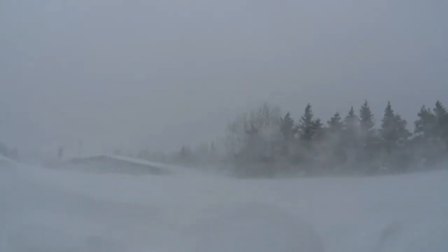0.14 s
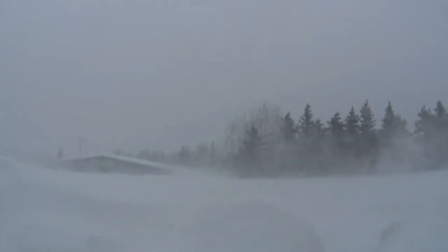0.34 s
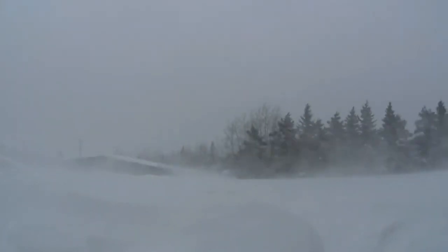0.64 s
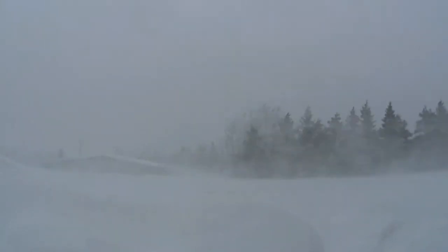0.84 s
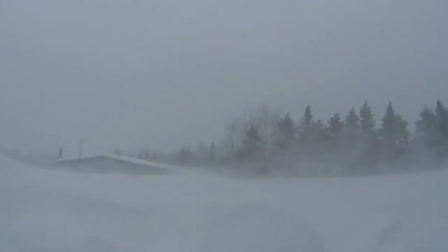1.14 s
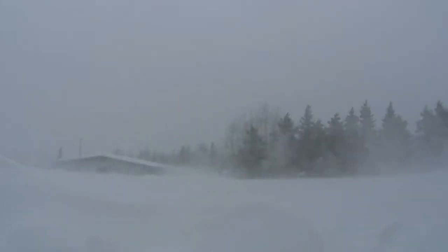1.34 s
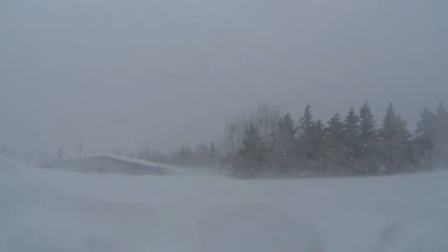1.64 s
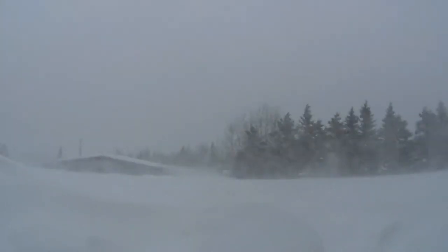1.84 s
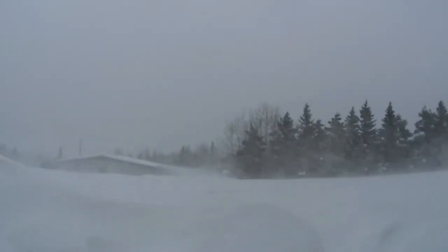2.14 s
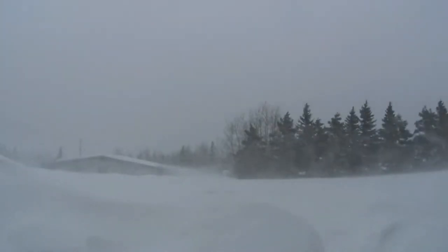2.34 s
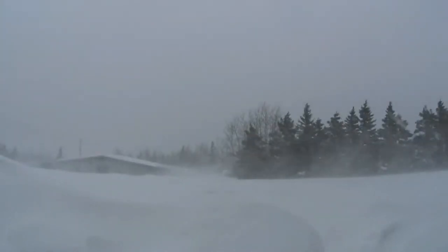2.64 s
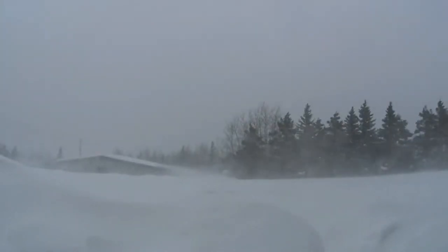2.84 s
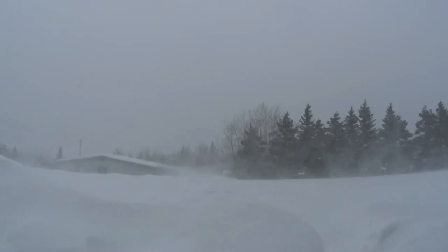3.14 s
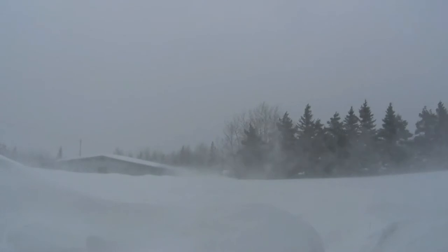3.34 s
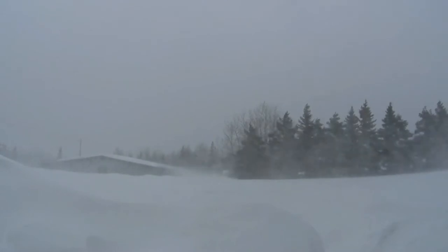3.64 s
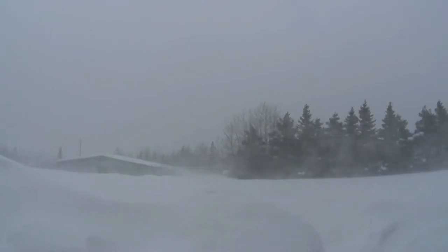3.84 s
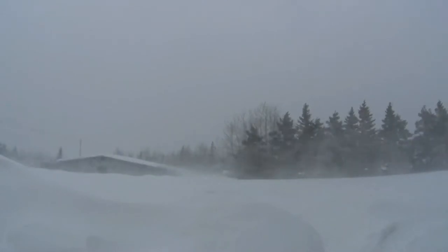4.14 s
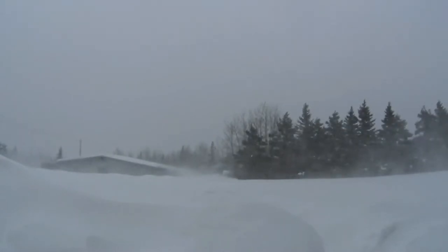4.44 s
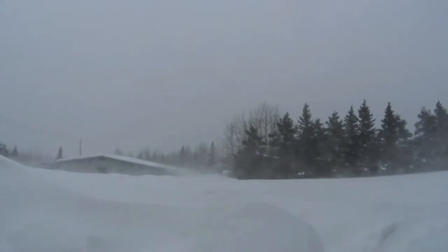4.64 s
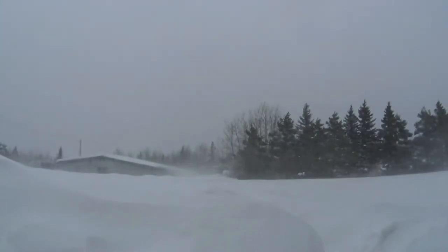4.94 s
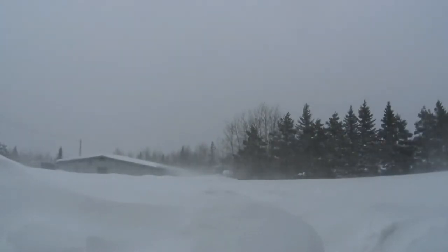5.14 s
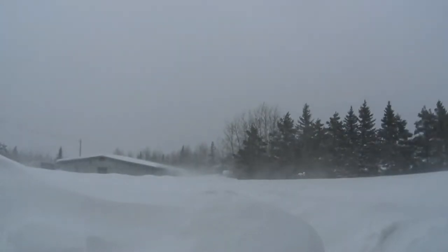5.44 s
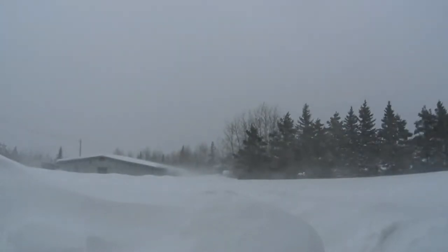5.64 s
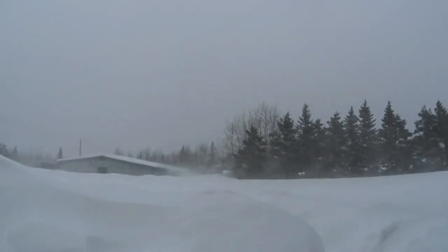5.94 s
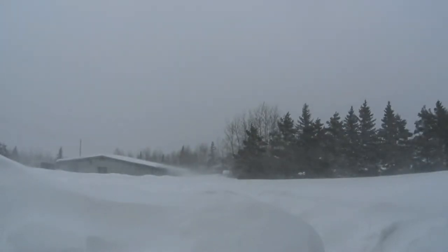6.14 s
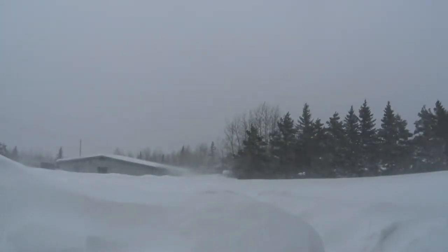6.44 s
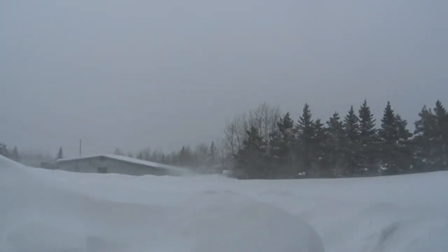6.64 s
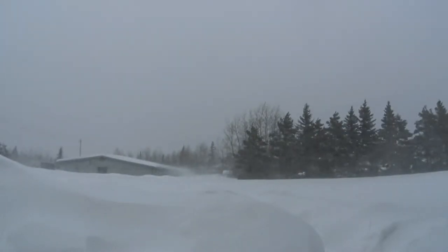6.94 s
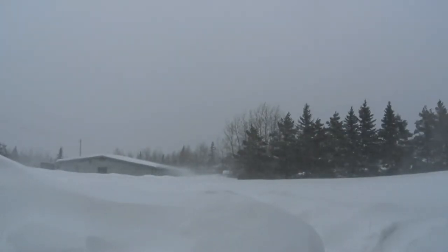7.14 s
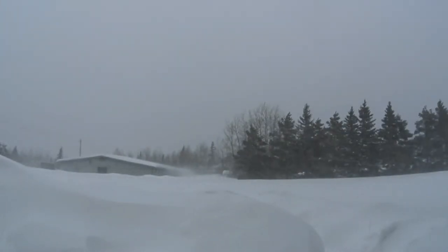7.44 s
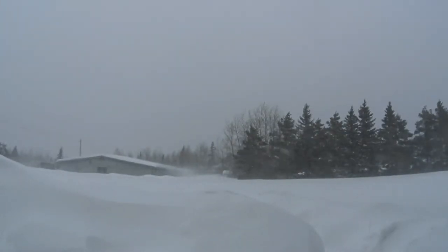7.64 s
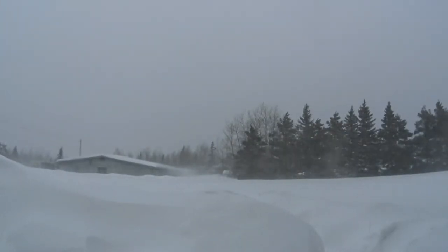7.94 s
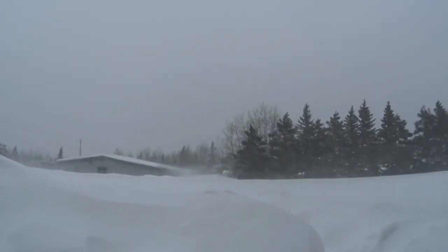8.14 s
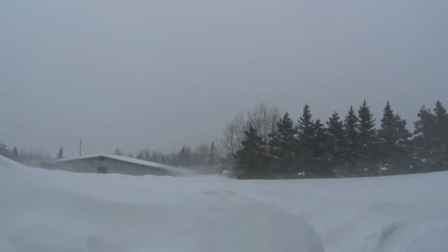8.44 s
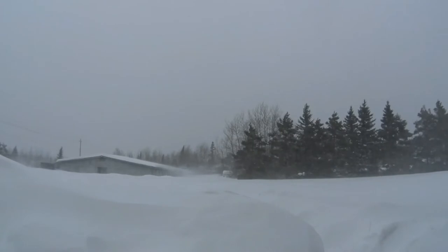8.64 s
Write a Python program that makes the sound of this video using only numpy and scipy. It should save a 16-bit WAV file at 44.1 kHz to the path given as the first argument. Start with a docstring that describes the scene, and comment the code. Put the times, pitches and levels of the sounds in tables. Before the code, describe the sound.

Close, rough stereo wind in a blizzard over an open field. From 0 s a strong gust hisses brightly and roars in the midrange, fluttering unevenly with tiny dropouts, while low pressure thumps buffet the microphone and a faint distant roar stays beneath. Fine snow patters within the hiss; from about 0.3 s larger grains tick sharply and short, fuzzy, reedy jets rasp around the upper midrange. Heavy low buffets cluster around 2.3-3.4 s; strong rasps and ticks follow around 3.4-3.8 s. The wind weakens from 4.2 s and drops abruptly at 4.8 s to a thin, quiet lull with a few small ticks. Near 5.8 s it jumps back, less strong than at first, with dense clicks, rasps and thumps through 7.5 s. It sags around 7.7 s, rises at 8 s, then fades towards 8.8 s.

```python
"""A blizzard over an open field, heard by two close microphone ports in a small housing that faces the wind.
From the start a strong wind hisses, rings the housing and buffets the ports; a far roar lies beneath.
Soon large snow grains tick and jets of air rasp across an edge near 2.5 kHz, as struck and flow-driven resonances.
Shortly before five seconds the wind sinks to a lull of about a second; it then returns with a dense run
of ticks and jets, weakens, rises once more and fades. Eddies throughout make the shaped noise jump and dip."""
import sys
import numpy as np
from scipy import signal
from scipy.fft import rfft, irfft, next_fast_len
from scipy.io import wavfile
from scipy.ndimage import uniform_filter1d

SR = 44100
rng = np.random.default_rng(int(sys.argv[2]) if len(sys.argv) > 2 else 0)


def field_ratio(decibels):
    """Amplitude ratio for a level in dB (20 dB per decade); scalars and array-likes work."""
    return 10 ** (np.asarray(decibels, dtype=float) / 20)


def persist_wave(psi):
    """Save psi, clipped to +-1, as 16-bit WAV."""
    counts = np.round(np.clip(psi, -1, 1) * 32767).astype(np.int16)
    wavfile.write(sys.argv[1], SR, np.atleast_2d(counts).T)


N = 388080

# How hard the wind presses on the housing. Each row: time in seconds, level in dB (read against FULL_WIND_DB).
WIND = [(0.0, -25), (0.3, -32), (0.9, -30), (1.3, -28.5), (1.7, -31.5), (2.0, -30.5), (2.6, -31.5),
        (3.05, -29.5), (3.6, -33), (4.0, -30), (4.3, -38), (4.62, -37.5), (4.8, -58), (5.68, -54.5),
        (5.84, -37), (6.37, -34), (6.75, -36), (7.01, -34), (7.2, -37), (7.69, -44.5), (8.0, -34),
        (8.4, -39.5), (8.8, -50.5)]
# Sudden lulls and puffs of the flow, of which each layer takes a share.
# Each row: start in seconds, length in seconds, change in dB.
EDDIES = [(0.095, 0.025, -7.5), (0.153, 0.093, -2), (0.252, 0.0565, -7.5), (0.312, 0.03, -1),
          (0.579, 0.03, -4), (0.763, 0.011, -7.5), (0.865, 0.025, -7.5), (1.047, 0.0093, 3.5),
          (1.058, 0.022, -4), (1.35, 0.017, -3), (1.131, 0.017, -7), (1.558, 0.028, -2), (1.79, 0.038, -7),
          (1.836, 0.055, -12.5), (2.405, 0.021, -16), (2.57, 0.065, 3.5), (2.657, 0.029, -6),
          (3.227, 0.014, 2.5), (3.267, 0.015, -6), (3.344, 0.048, 5), (3.44, 0.015, -6), (3.67, 0.03, -10),
          (3.743, 0.045, -6.5), (3.796, 0.022, -4.5), (3.916, 0.0094, -12), (4.107, 0.019, -8),
          (4.221, 0.022, -9), (4.272, 0.019, 4.5), (4.298, 0.023, -10), (4.34, 0.023, 1.5),
          (4.415, 0.075, -10), (4.729, 0.022, -5), (4.751, 0.045, 13.5), (5.165, 0.033, 6.5),
          (5.548, 0.035, 6.5), (5.7, 0.047, 5.5), (5.837, 0.0045, 8), (5.88, 0.022, -9), (5.971, 0.02, -11),
          (6.061, 0.035, -11), (6.157, 0.017, -7), (6.274, 0.025, -6), (6.385, 0.012, 0.5),
          (6.453, 0.016, -6), (6.575, 0.037, -5), (6.798, 0.024, -9), (6.867, 0.054, -4.5),
          (6.957, 0.024, -13), (6.984, 0.026, 4), (7.17, 0.039, -7), (7.26, 0.028, -6.5), (7.36, 0.035, -4),
          (7.387, 0.018, -6), (7.44, 0.009, 8), (7.482, 0.0073, 2), (7.536, 0.032, 8.5), (7.606, 0.02, -5),
          (7.63, 0.02, 7), (7.979, 0.02, 5.5), (8.002, 0.031, -3.5), (8.103, 0.047, 4), (8.164, 0.05, -6),
          (8.348, 0.0086, 7.5), (8.413, 0.043, -9), (8.5, 0.022, -2.5), (8.619, 0.022, 6.5)]
# Heavy lumps of air breaking over the housing.
# Each row: middle in seconds, length in seconds, peak lift of the rumble in dB.
BUFFETS = [(0.02, 0.11, 3.5), (0.116, 0.07, 17), (0.453, 0.11, 12.5), (0.602, 0.08, 7), (0.777, 0.19, 6.5),
           (0.833, 0.067, 16.5), (1.07, 0.17, 11), (1.282, 0.28, 5.5), (1.532, 0.085, 8), (1.94, 0.058, 4),
           (2.137, 0.077, 8), (2.313, 0.2, 9), (2.488, 0.13, 15.5), (2.586, 0.15, 16.5),
           (2.687, 0.099, 14.5), (2.82, 0.23, 13.5), (2.932, 0.14, 12.5), (3.005, 0.11, 16),
           (3.099, 0.16, 16), (3.24, 0.08, 8), (3.364, 0.19, 11), (3.807, 0.49, 9), (4.01, 0.093, 10.5),
           (4.176, 0.34, 7.5), (4.62, 0.17, 7.5), (5.875, 0.05, 13), (6.023, 0.25, 3.5), (6.242, 0.2, 9.5),
           (6.652, 0.054, 12), (6.77, 0.12, 12), (6.828, 0.055, 15), (7.057, 0.22, 12), (5.98, 0.56, 4),
           (7.9, 1.7, 3.5), (8.26, 0.06, 9), (7.567, 0.069, 9.5), (7.957, 0.06, 17), (8.076, 0.2, 6),
           (8.353, 0.2, 2), (8.58, 0.33, 9.5)]
# Large snow grains. Each row: start in seconds, relative level in dB,
# landing place round the housing (0 body, 1 edge, 2 grille, 3 body again), left over right in dB.
TICKS = [(0.267, -20, 1.5, -3), (0.5999, -39, 1.3, 2), (0.777, -14, 0.1, -1), (0.8983, -7, 1.34, 1.7),
         (1.8484, -11, 1.3, 2), (2.411, -9, 2.3, 3), (3.6736, -13, 2.0, 4), (3.706, -6, 1.3, 6),
         (3.745, -2, 2.43, -1), (3.791, -8.5, 0.1, 0), (4.219, -10, 0.96, 7), (4.2948, -9.5, 2.4, 2),
         (4.3755, -23, 1.9, -5), (4.424, -13, 1.4, -2), (4.6686, -15.5, .5, 9), (4.7055, -20, 2, 1.5),
         (4.7237, -20, 3, 0), (4.7567, -14.5, 0.48, 5), (4.9508, -20.5, 2.5, 1), (5.1654, -18.5, 2.4, 1),
         (5.257, -14.5, 1.3, 4), (5.3573, -15, 1.4, -2), (5.9978, -6, 2.57, 1), (6.0237, -13, 0.1, 2),
         (6.1084, 2, 0.23, -2), (6.4236, -11, .8, 2), (6.445, -16, 0.1, 0.2), (6.527, -12, 0.86, 1),
         (6.755, -16, 1.7, 1), (6.9215, -3, 0.61, 9), (6.938, -21, 2.6, 1), (6.946, -24, 2.0, 1),
         (6.955, -28, 2.2, 1), (7.037, -16, 2.1, 1), (7.049, -15, 2.2, 3), (7.1248, -4.5, 3, 2),
         (7.1437, -14, .2, 3), (7.215, -7, 0.66, 3.9), (7.241, -13, 1.2, 3), (7.2532, -13, 1.55, 3.7),
         (7.411, -11, 2.3, 1), (7.4499, -10, 0.18, -1), (7.468, -17, 0.05, 0), (7.5217, -12, 0.57, 4),
         (7.7805, -11, 0.48, 1.4), (8.032, -14.5, 2.45, -2), (8.1225, -4, 0.18, 4), (8.148, -17, 2.3, 3),
         (8.27, -9, .45, 8), (8.4541, -12, 0.54, 3), (8.4932, -13.5, 0.92, 10), (8.579, -11, 0.66, -5),
         (8.7848, -20.5, 2.5, -1)]
# Jets of air across an edge.
# Each row: start in seconds, length in seconds, relative level in dB, relative spray over tone in dB.
JETS = [(0.375, 0.058, -18.5, -0.5), (0.43, 0.021, -19.5, -1.5), (0.462, 0.13, -17.5, 1.5),
        (0.598, 0.01, -28, -10), (0.812, 0.068, -23, -6), (0.895, 0.022, -16, -18),
        (0.924, 0.028, -19, -13), (1.133, 0.038, -17, -3), (1.179, 0.049, -16, -12.5),
        (1.217, 0.09, -22.5, 6.5), (1.551, 0.036, -11.5, -16), (1.597, 0.028, -19, -16),
        (1.687, 0.086, -16, -13), (1.799, 0.027, -17.5, -10), (1.893, 0.0085, -15, -14),
        (2.339, 0.029, -19, -15), (2.64, 0.027, -20.5, -1), (2.854, 0.028, -20.5, -12),
        (3.135, 0.081, -13, -10.5), (3.248, 0.026, -24, -13), (3.283, 0.057, -15.5, -5),
        (3.357, 0.017, -15.5, -8), (3.403, 0.042, -17, -11), (3.459, 0.087, -9.5, -8),
        (3.55, 0.069, -10.5, -6), (3.618, 0.017, -8.5, -4), (3.706, 0.019, -24, -18),
        (4.118, 0.074, -16.5, -8.5), (4.256, 0.026, -20, -16), (4.483, 0.12, -11, -9),
        (4.612, 0.032, -9.5, -12), (4.647, 0.027, -26, -19), (5.829, 0.018, -5.5, -22),
        (6.04, 0.015, -21.5, -19), (6.117, 0.029, -16, -20), (6.143, 0.02, -14.5, -15),
        (6.49, 0.018, -18.5, -20), (6.513, 0.018, -10.5, -13.5), (6.652, 0.042, -14, -10.5),
        (6.698, 0.042, -15.5, -20), (6.772, 0.04, -12, -16), (6.822, 0.067, -7, -13.5),
        (6.891, 0.041, -21, -26), (7.071, 0.039, -14, -12), (7.165, 0.045, -13, -10.5),
        (7.208, 0.016, -12, -16), (7.306, 0.046, -16, -14), (7.513, 0.045, -26.5, -11),
        (7.75, 0.045, -23.5, -18), (7.83, 0.088, -15.5, -18), (8.045, 0.022, -14.5, -14),
        (8.158, 0.067, -11, -11), (8.218, 0.029, -12.5, -12), (8.267, 0.015, -7.5, -15),
        (8.286, 0.041, -9, -17), (8.461, 0.043, -19, -17), (8.54, 0.042, -16.5, -16),
        (8.647, 0.024, -23.5, -27)]

# Spectrum of the far trees and field. Each row: frequency in Hz, relative density in dB per Hz.
FAR_ROAR = [(40, -34), (160, -22), (640, -20.5), (955, -12.5), (1390, 0), (2030, -26), (2500, -5),
            (3480, -10.5), (4500, -10.5), (5300, -21), (6500, -43), (8700, -36), (11000, -34.5)]
# Spectrum of air and snow on the grille. Each row: frequency in Hz, relative density in dB per Hz.
HISS = [(1940, -33), (3300, -14.5), (3640, -10), (3850, -8), (4740, -2.5), (5520, 1), (6300, 0), (7340, -6),
        (8850, -14.5), (10800, -34.5), (11300, -23), (11500, -88), (12200, -80), (15900, -89),
        (22000, -120)]
# Low modes of the housing. Each row: frequency in Hz, relative density in dB per Hz.
RING = [(180, -30.5), (300, -24), (464, -23), (789, -16), (857, -14), (1100, -8), (1350, 0), (1500, -2.5),
        (1740, -2), (2070, -9.5), (2430, -2.5), (2750, -10), (3240, -23), (3600, -30), (4680, -53.5),
        (7920, -120)]
# Spectrum of the buffeting pressure. Each row: frequency in Hz, relative density in dB per Hz.
RUMBLE = [(40, -24), (65, -3), (100, 1), (150, 1), (228, -4), (307, -10.5), (426, -17.5), (600, -19.5),
          (780, -41), (1320, -100)]
# Spectrum of the deep sway. Each row: frequency in Hz, relative density in dB per Hz.
DEEP = [(12, -32), (27, 0.5), (40, -5), (60, -4.5), (90, -11), (200, -85)]
# Response of the struck edge. Each row: frequency in Hz, relative density in dB per Hz.
EDGE = [(900, -41), (1500, -13), (2000, -12), (2600, 7.5), (3300, -1), (4300, -14), (6000, -43),
        (12000, -86)]
# Spectrum of the spray of a jet. Each row: frequency in Hz, relative density in dB per Hz.
RASP = [(900, -20), (1500, -12), (1900, -4), (2500, -8.5), (3300, 0.5), (4000, -2), (4900, -0.5),
        (5400, -14), (7500, -21.5), (9500, -47), (12000, -76)]
# Phase between the ports. Each row: frequency in Hz, lead of the left port in radians.
LEAD = [(0, 3), (300, -1.02), (780, -2.0), (1460, -1.29), (2330, -2.0), (2670, -2.5), (3790, -1.8),
        (4740, -1.13), (6630, -2), (7580, -1.17), (8700, -1.4), (10900, 0.5)]
# Level between the ports. Each row: frequency in Hz, left over right in dB.
TILT = [(60, 0.5), (110, -3), (190, -2.5), (350, -2), (630, 0.5), (1130, -0.5), (2030, 0.5), (3640, 0),
        (6550, 2.5), (11800, -1)]
# Sound common to both ports. Each row: frequency in Hz, share from 0 to 1.
ALIKE = [(30, 0.95), (150, 0.89), (300, 0.7), (600, 0.33), (1400, 0.98), (2000, 0.1), (2800, 0.58),
         (3300, 0.43), (4500, 1), (6200, 1), (8200, 0.2), (11000, 0.6)]

FULL_WIND_DB = -30
# Each layer: level in full wind in dB, and dB gained per dB of wind.
HISS_DB, HISS_FOLLOWS = -24, 1
RING_DB, RING_FOLLOWS = -22, 0.76
RUMBLE_DB, RUMBLE_FOLLOWS = -44.5, 0.54
SWAY_DB, SWAY_FOLLOWS = -48.5, 0.41
# Under a jet of full strength (dB) the hiss rises slightly and the ring sinks: change of each part in dB.
STRONG_JET_DB, HISS_JET_DB, RING_JET_DB = -14, 1, -5
JET_ARCH_DB, JET_SPUTTER_DB, SPUTTERS_PER_S = 4.5, 2, 28
SPRAY_FOLLOWS = 1.22  # dB of spray per dB of jet swell
JET_ALIKE = 0.95  # a jet is one small source, so the ports nearly agree
STRAYS_PER_S, STRAY_DB, STRAY_FOLLOWS = 30, -28.5, 0.59  # rate per part; level before size and part
FALLOFF_DB = 14.5  # loss one step from the blow, growing with distance squared
HOLLOW_HZ, HOLLOW_WIDTH_HZ, HOLLOW_DB = 1370.5, 119, -13


def evened(x):
    """Normalisation: scales a signal to rms 1."""
    return x / np.sqrt(np.mean(x ** 2) + 1e-20)


def read(points, hz):
    """Interpolation on a logarithmic frequency axis."""
    f, value = np.transpose(points)
    return np.interp(np.log(hz + 1), np.log(f + 1), value)


def wander(per_s, channels=1):
    """Low-passed noise: a smooth random curve of rms 1 that changes about per_s times a second."""
    steps = rng.standard_normal((channels, N))
    smoother = signal.butter(2, per_s, fs=SR, output="sos")
    return evened(signal.sosfilt(smoother, steps))


def ports(drive, spectrum, alike=None):
    """Partial coherence: minimum-phase filtering of a common and a private drive; white noise keeps its rms."""
    size = next_fast_len(N + 8192)
    half = size // 2 + 1
    hz = abs(np.fft.fftfreq(size, 1 / SR))
    log_gain = np.log(field_ratio(np.maximum(read(spectrum, hz), -100)))
    colour = np.exp(np.conj(signal.hilbert(log_gain)))[:half]  # minimum phase
    colour /= np.sqrt(np.mean(abs(colour) ** 2))
    hz = hz[:half]
    same = np.clip(read(ALIKE, hz) if alike is None else alike, 0, 1)
    common, private = rfft(drive, size) * colour
    right = same * common + np.sqrt(1 - same ** 2) * private
    right = right * np.exp(-1j * read(LEAD, hz))
    tilt = field_ratio(read(TILT, hz) / 2)
    return irfft([common * tilt, right / tilt], size)[:, :N]


def gust(level_db, follows, eddy_share, extra_db):
    """Amplitude modulation by the flow: a layer follows the wind and takes a share of each eddy."""
    eddy_db = np.zeros(N)
    for start, length, change_db in EDDIES:
        eddy_db[round(start * SR):round((start + length) * SR)] += change_db
    eddy_db = uniform_filter1d(eddy_db, 150)
    wind_db = np.interp(np.arange(N) / SR, *np.transpose(WIND)) - FULL_WIND_DB
    return field_ratio(level_db + follows * wind_db + eddy_share * eddy_db + extra_db)


def sleet(slow_db, fast_db, grain_share, per_s, spread_db):
    """Turbulence plus random impacts: fluttering air noise mixed in power with a patter of fine snow grains."""
    air = rng.standard_normal((2, N))
    sizes = field_ratio(spread_db * np.minimum(rng.exponential(1, (2, N)), 3))
    lands = rng.random((2, N)) < per_s / SR
    grains = sizes * lands * rng.choice([-1., 1.], (2, N))
    share = np.clip(grain_share, 0, 1)
    mixed = np.sqrt(1 - share) * air + np.sqrt(share) * evened(grains)
    flutter = field_ratio(slow_db * wander(22.0) + fast_db * wander(230.0))
    return evened(flutter * mixed)


def resonate(x, hz, width_hz):
    """Heterodyne resonance that follows the curve hz: shift down to zero, smooth twice, shift back."""
    turn = np.exp(2j * np.pi * np.cumsum(hz) / SR)
    r = np.exp(-np.pi * width_hz / SR)
    low = x / turn
    for _ in range(2):
        low = signal.lfilter([1 - r], [1, -r], low)
    return 2 * (turn * low).real


def far_roar():
    """Steady broadband noise of distant turbulence, which lies a little to the right."""
    return field_ratio(-40.5) * ports(rng.standard_normal((2, N)), FAR_ROAR) * field_ratio([[-.9], [.9]])


def rush(effort_db, spray_db):
    """Shared excitation: one flow drives treble hiss and low housing modes, each with flutter of its own."""
    jet_strength = np.minimum(field_ratio(effort_db + 1.2 * spray_db - STRONG_JET_DB), 1)
    jet_strength = uniform_filter1d(jet_strength, 600)
    flow = sleet(slow_db=1.37, fast_db=3.0, grain_share=0.27, per_s=1100, spread_db=1.5)
    hiss_gain = gust(HISS_DB, HISS_FOLLOWS, 1.0, HISS_JET_DB * jet_strength)
    hiss = ports(flow * hiss_gain * field_ratio(1.46 * wander(240.0)), HISS)
    ring_gain = gust(RING_DB, RING_FOLLOWS, 0.97, RING_JET_DB * jet_strength)
    ring = ports(flow * ring_gain * field_ratio(1.0 * wander(82.0)), RING)
    return hiss + ring


def rumble():
    """Low-frequency pressure fluctuation: lumps of air break over the housing above a smoother deep sway."""
    lift_db = np.zeros(N)
    for middle, length, db in BUFFETS:
        offset = 2 * (np.arange(N) / SR - middle) / length
        lift_db += db * np.maximum(1 - offset ** 2, 0) ** 1.42
    lumps = field_ratio(1.65 * wander(15.0) + 1.8 * wander(36.0))
    air = evened(lumps * rng.standard_normal((2, N)))
    buffeting = ports(air * gust(RUMBLE_DB, RUMBLE_FOLLOWS, 0.29, lift_db), RUMBLE)
    sway_gain = gust(SWAY_DB, SWAY_FOLLOWS, 0.1, 0.5 * lift_db)
    sway = ports(rng.standard_normal((2, N)) * sway_gain, DEEP)
    return buffeting + sway


def ticks():
    """Impulse response: a blow and short crackle excite grille, edge and body by where the grain lands."""
    blows, side = np.zeros((3, 2, N)), np.ones((2, N))
    shapes = 0.21 * rng.standard_normal((len(TICKS), 64)) * np.exp(-np.arange(64) / 10.5)
    shapes[:, 0] = 1  # the blow itself
    for (start, db, lands, pan_db), shape in zip(TICKS, shapes):
        at = round(start * SR)
        away = (lands - np.array([2, 1, 0]) + 1.5) % 3 - 1.5  # shortest way round to grille, edge, body
        part_gain = field_ratio(db - FALLOFF_DB * away ** 2)[:, None, None]
        blows[:, :, at:at + 64] += part_gain * shape / np.linalg.norm(shape)
        side[:, at - 40:at + 400] = field_ratio([[pan_db / 2], [-pan_db / 2]])
    # smaller grains that land by chance
    sizes = field_ratio(4.1 * np.minimum(rng.exponential(1, (3, 1, N)), 3))
    strays = sizes * (rng.random((3, 1, N)) < STRAYS_PER_S / SR)
    blows += strays * gust(STRAY_DB, STRAY_FOLLOWS, 0.66, 0) * field_ratio([0, -4, -1])[:, None, None]
    boosts = field_ratio([14.5, 15.5, 16.5])  # a blow spreads over its ring
    parts = zip(boosts, blows, (HISS, EDGE, RING))
    return side * sum(boost * ports(blow, colour, 0.94) for boost, blow, colour in parts)


def jet_effort():
    """Envelope of an unsteady jet: level and spray in dB arch up and down together, and sputter."""
    effort_db, spray_db = np.full(N, -90.), np.full(N, -10.)
    sputter_db = JET_SPUTTER_DB * wander(SPUTTERS_PER_S)[0]
    for start, length, db, wide_db in JETS:
        at = slice(round(start * SR), round((start + length) * SR))
        arch = np.sin(np.linspace(0, np.pi, at.stop - at.start)) - 2 / np.pi  # about zero mean
        swell_db = JET_ARCH_DB * arch + sputter_db[at]
        effort_db[at] = db + swell_db
        spray_db[at] = wide_db + SPRAY_FOLLOWS * swell_db  # harder air sprays wider
    return effort_db, spray_db


def jets(effort_db, spray_db):
    """Edge tone: each jet starts and stops within milliseconds, sings a fuzzy tone and sprays a wider hiss."""
    level = uniform_filter1d(field_ratio(effort_db), 90)
    spray_db = uniform_filter1d(spray_db, 200)
    sputter = sleet(slow_db=0.5, fast_db=3.0, grain_share=0.28, per_s=900, spread_db=4.0)
    # faster air sings higher, and wavers
    tone_hz = (2760.0 + 17.4 * spray_db) * (1 + 0.014 * wander(64.0)[0])
    tone = evened(resonate(sputter, tone_hz, width_hz=710.0)) * level
    flat = [(0, 0), (SR, 0)]
    sung = field_ratio(0.2) * ports(tone, flat, JET_ALIKE)
    sprayed = field_ratio(-2.0) * ports(sputter * level * field_ratio(spray_db), RASP, JET_ALIKE)
    return (sung + sprayed) * field_ratio([[.8], [-.8]])  # the edge sits nearer the left port


def hollow(x):
    """Cavity resonance: the hollow behind the ports lifts one narrow band of whatever reaches it."""
    return x + field_ratio(HOLLOW_DB) * resonate(x, np.full(N, HOLLOW_HZ), HOLLOW_WIDTH_HZ)


def scene():
    """Superposition: far roar, rush and ticks pass the cavity; rumble and jets add directly."""
    effort_db, spray_db = jet_effort()
    through_cavity = hollow(far_roar() + rush(effort_db, spray_db) + ticks())
    return through_cavity + rumble() + jets(effort_db, spray_db)


def top_cut(x):
    """Nothing passes above the cut-off."""
    return signal.sosfilt(signal.butter(12, 12370, fs=SR, output="sos"), x)


def record(dry):
    """Compression and saturation: gain control flattens the loudest puffs, peaks round off, treble is cut."""
    power_db = 10 * np.log10(abs(uniform_filter1d((dry ** 2).mean(0), 260)) + 1e-12)
    fall_db = np.arange(N) * 400.0 / SR  # recovery of 400 dB a second
    peak_db = np.maximum.accumulate(power_db + fall_db) - fall_db
    over_db = np.maximum(peak_db + 16.0, 0)  # threshold -16 dB
    held = dry / field_ratio(0.75 * uniform_filter1d(over_db, 120))
    top = 0.8  # ceiling of the input stage
    rounded = held / (1 + abs(held / top) ** 4) ** 0.25
    low_pass = signal.firwin(301, 11000, window=("kaiser", 7), fs=SR)
    limited = signal.oaconvolve(rounded, low_pass[None], "same")
    return top_cut(limited)


dry = scene()
out = record(dry)
persist_wave(out)
```